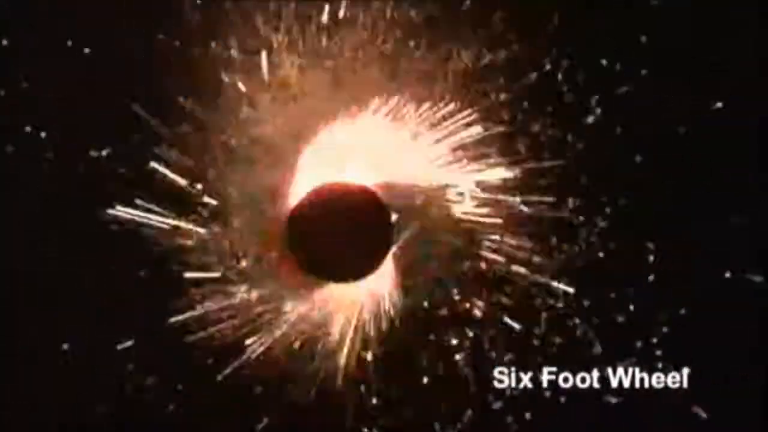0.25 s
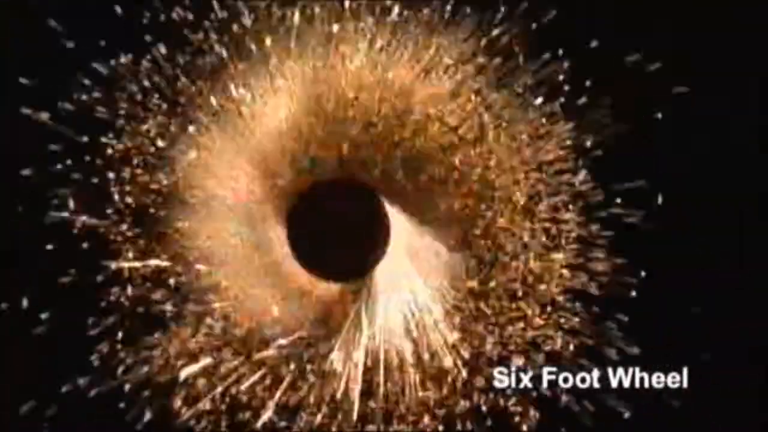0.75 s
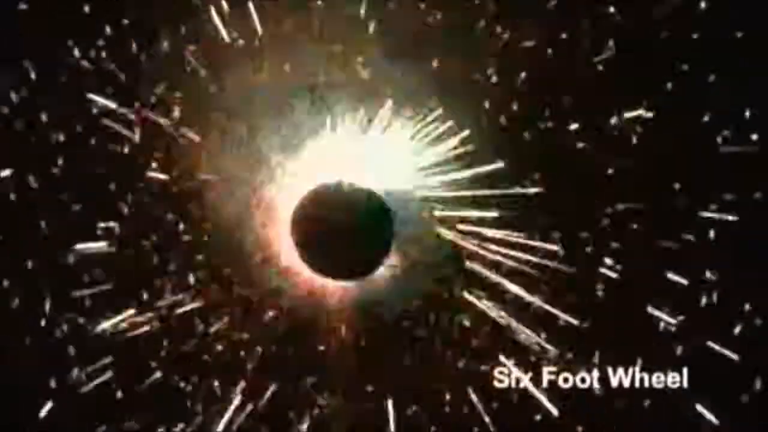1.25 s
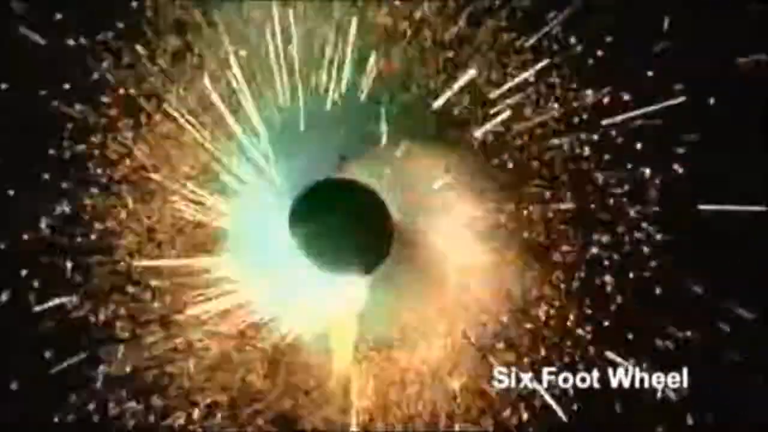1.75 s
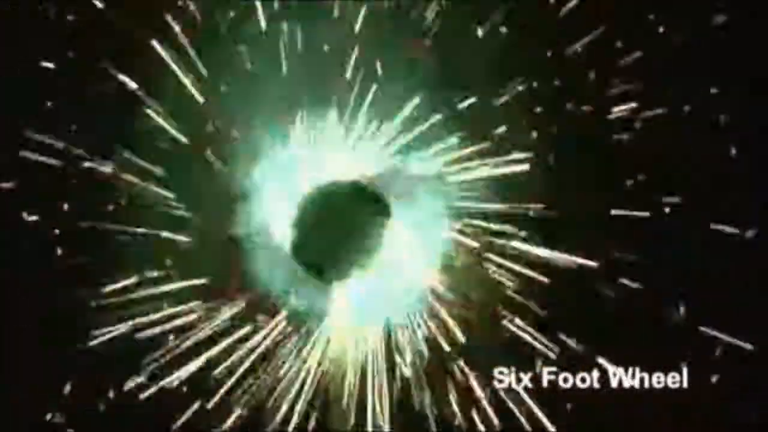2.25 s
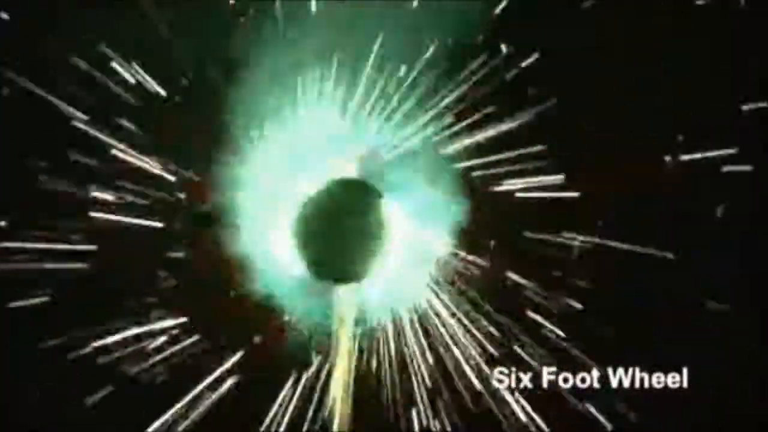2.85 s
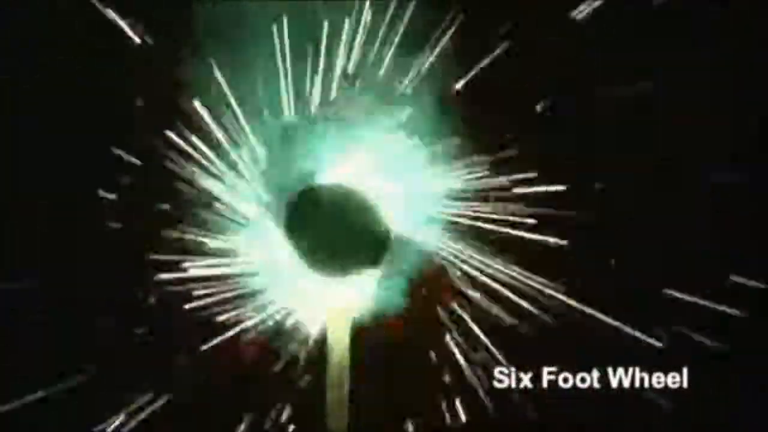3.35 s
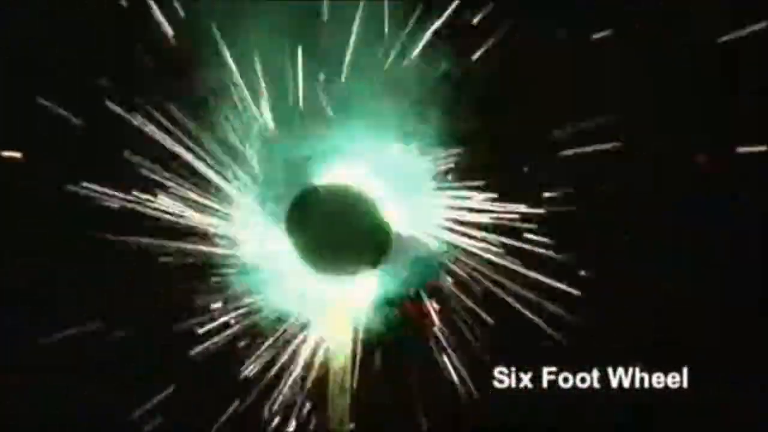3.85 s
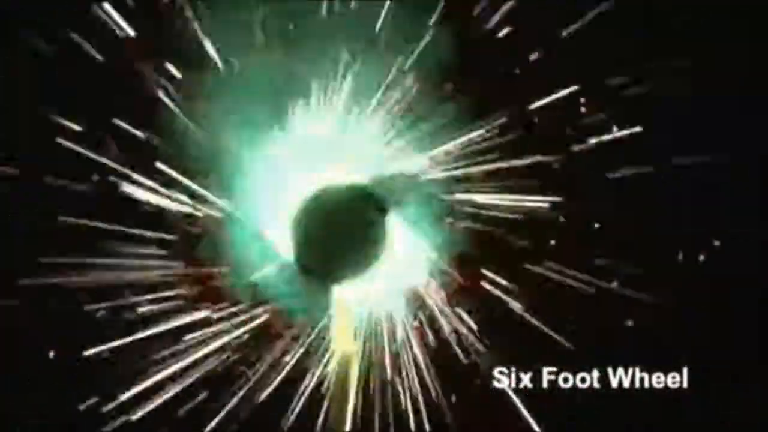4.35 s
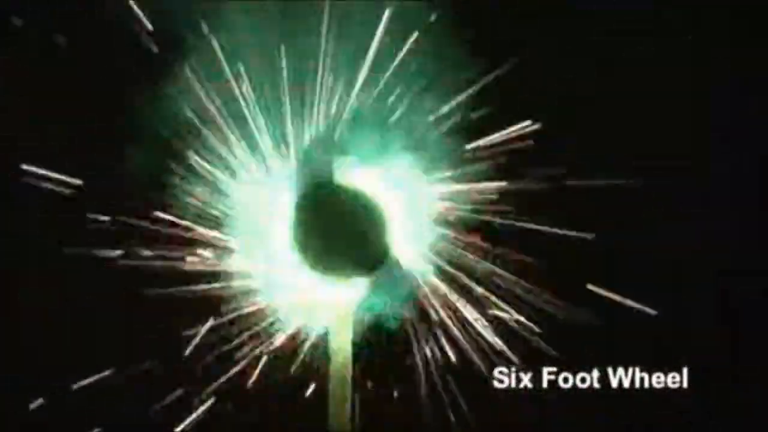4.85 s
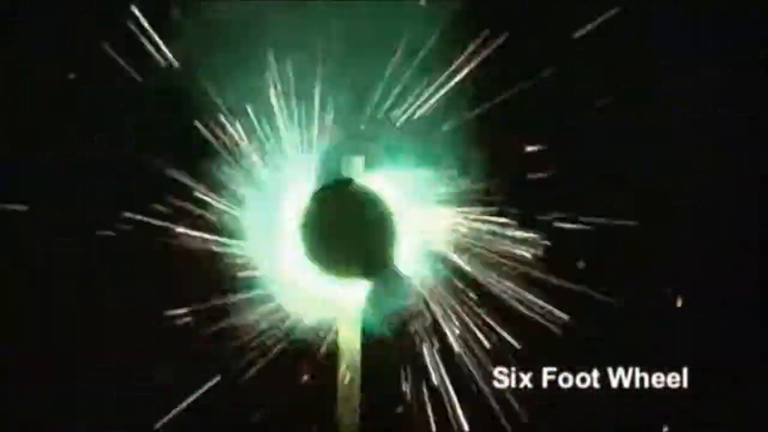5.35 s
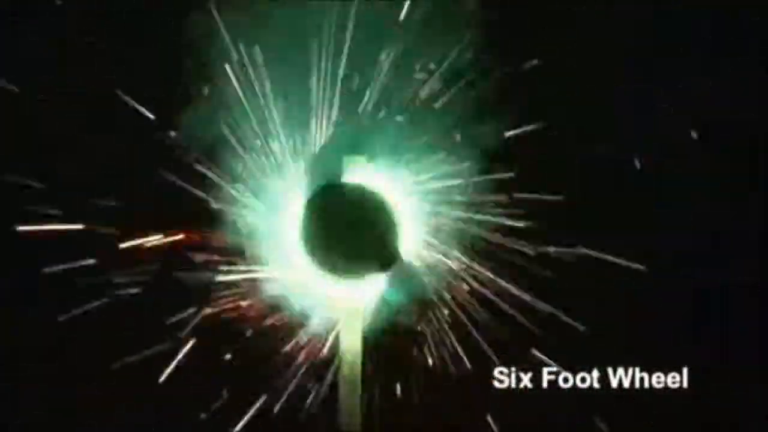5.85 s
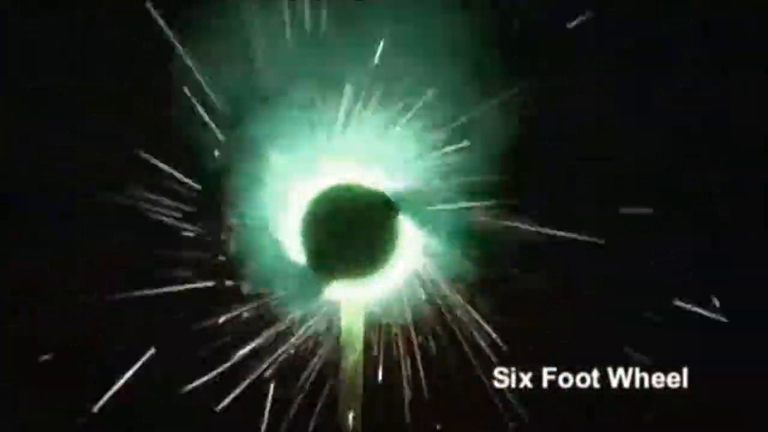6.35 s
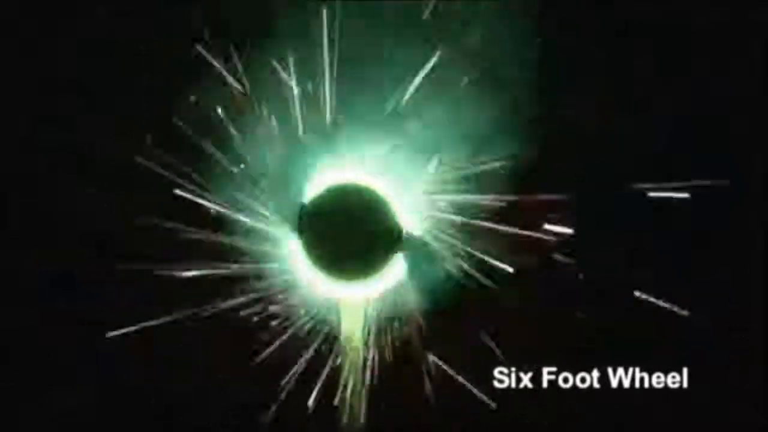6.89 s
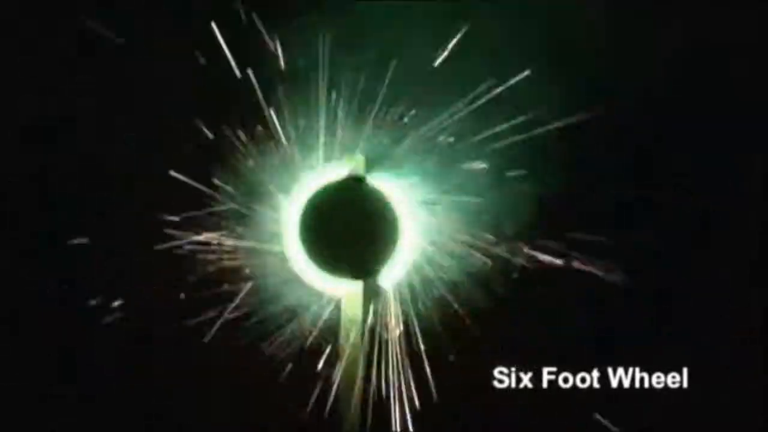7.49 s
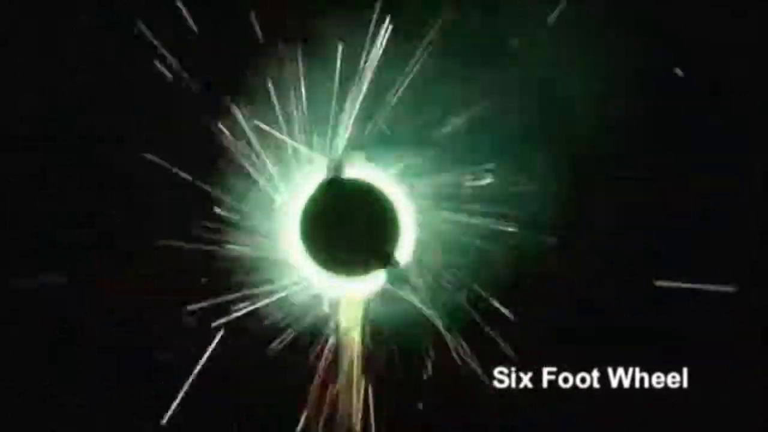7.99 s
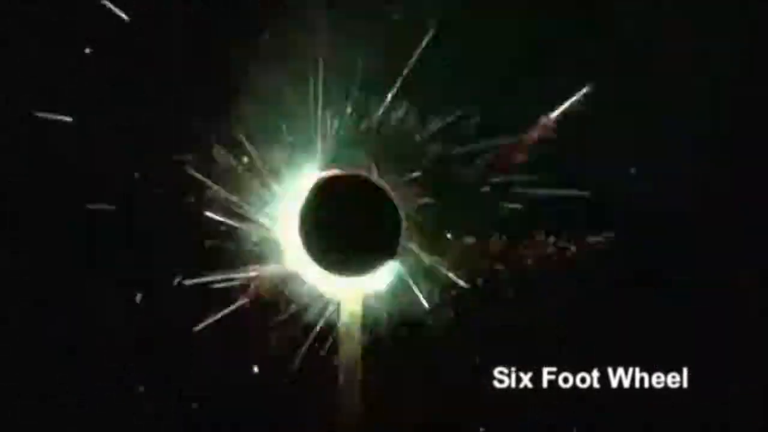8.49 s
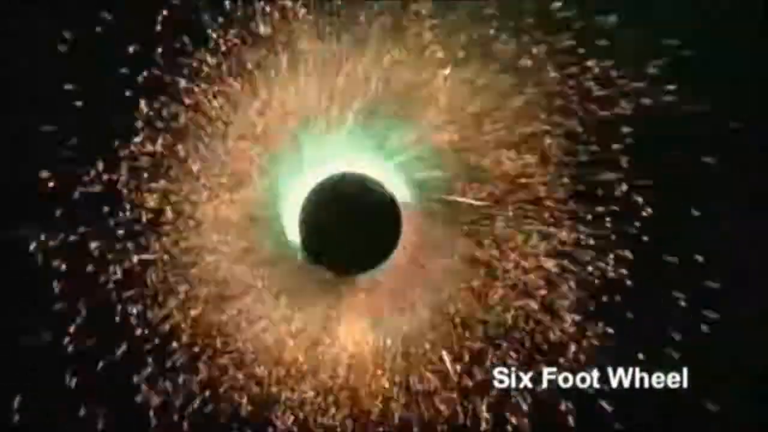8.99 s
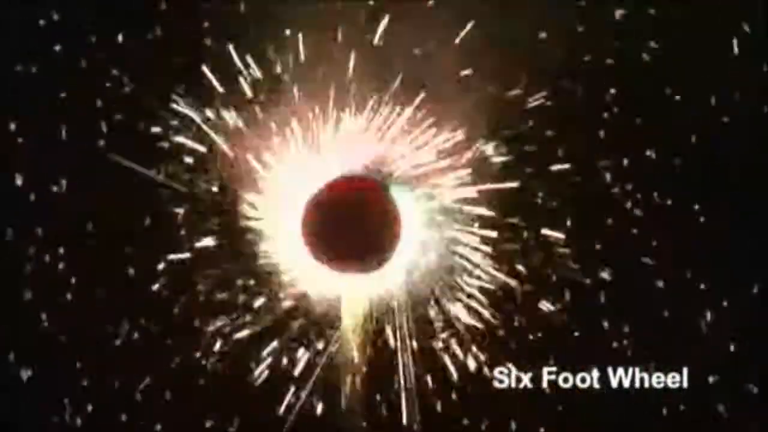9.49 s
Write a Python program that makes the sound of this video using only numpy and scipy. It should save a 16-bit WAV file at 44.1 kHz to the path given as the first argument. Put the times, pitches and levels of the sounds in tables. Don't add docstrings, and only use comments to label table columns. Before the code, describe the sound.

A spinning firework wheel hisses and roars with a fast fluttering whoosh, accelerating, with low wind thumps and sharp crackling pops near the end.

```python
import sys
import numpy as np
from scipy import signal
from scipy.fft import rfft, irfft, next_fast_len
from scipy.io import wavfile
from scipy.ndimage import uniform_filter1d, map_coordinates

SR = 44100
rng = np.random.default_rng(int(sys.argv[2]) if len(sys.argv) > 2 else 0)


def makeup_ratio(level_db):
    decades = np.asarray(level_db, float) / 20
    return 10 ** decades


def file_out(sig):
    cols = np.atleast_2d(sig).T
    lim = np.clip(cols, -1, 1)
    pcm = np.round(lim * 32767).astype(np.int16)
    wavfile.write(sys.argv[1], SR, pcm)


N = 429093
T = np.arange(N) / SR
PAD = next_fast_len(N)
HZ = np.fft.rfftfreq(PAD, 1 / SR)

# start_s, gas_power_db, jet_sharpness_db
BURN = [(0, -28.5, 2), (.32, -26.5, 0), (.56, -31.5, 1.5), (.99, -26.5, 0.09), (1.15, -29, -2),
        (1.3, -33.5, -1.5), (1.63, -24, -6.5), (2.0, -24, -5), (2.25, -26, -4.5), (2.75, -24.5, -5.5),
        (4.3, -23.5, -2.2), (6.2, -23.5, -0.9), (6.9, -25, 0.1), (7.6, -26, 6), (8.45, -26.5, 3.5),
        (8.68, -29.5, 2.5), (9.24, -26, 1), (9.58, -27.5, 4.5)]
ROAR_REF_DB = -27
GREEN_FROM_S, GREEN_TO_S, CHANGE_S, BURNOUT_S = 1.4, 8.52, 0.31, 0.099
GOLD_CATCHES_S = 8.33
GROUND_MS, SWING_MS = .937, .082
BUFFET_HZ = 75
FRAME, GRID = 1024, 752


def unit(x):
    return x / np.sqrt(np.mean(x ** 2))


def curves(table):
    s, *columns = np.transpose(table)
    return [np.interp(T, s, c) for c in columns]


def shape(x, gain):
    return irfft(rfft(x, PAD) * gain, PAD)[..., :N]


def colour(x, points):
    hz, db = np.transpose(points)
    return shape(x, makeup_ratio(np.interp(np.log(HZ + 1), np.log(hz), db)))


def below(x, hz):
    return shape(x, 1 / (1 + (HZ / hz) ** 8))


def peak(hz, width_hz):
    return 1 / (1 + (2 * (HZ - hz) / width_hz) ** 4)


def walk(rate_hz):
    hold = int(SR / rate_hz)
    steps = np.repeat(rng.standard_normal(N // hold + 1), hold)
    slewed = uniform_filter1d(uniform_filter1d(steps, hold), hold)
    return unit(slewed[:N])


def after(s, ramp_s):
    return np.clip((T - s) / ramp_s + .5, 0, 1)


def green(end_s=GREEN_TO_S):
    share = after(GREEN_FROM_S, CHANGE_S) - after(end_s, BURNOUT_S)
    return share, share * (T - GREEN_FROM_S)


def via_ground(x, lag_ms):
    # pitch_hz, level_db re direct
    ground = [(500, -9), (2200, -6), (3500, -4), (7000, -4.5), (10000, -9), (16000, -18)]
    echo = map_coordinates(colour(x, ground), [np.arange(N) - lag_ms * SR / 1000], order=3)
    return x + echo


def flame(alone):
    # pitch_hz, level_db per Hz
    jet_spectrum = [(210, -32), (350, -21.5), (662, -11), (925, -6.5), (1670, -3.5), (2090, -1), (2780, -3),
                    (3310, -1), (4410, -8.5), (5180, -7), (5610, -7.5), (7010, -7.5), (9490, -9.5),
                    (15100, -13), (15800, -41.5)]
    splits_hz = [1650, 4000, 7700]
    spit_db, flicker_db = 0.98, 0.52
    sparks_per_s, spark_spread_db, spark_db = 1500, 4, -12
    falter_db, falter_dull_db = -3, 0

    gas = rng.standard_normal(N) * makeup_ratio(spit_db * walk(120))
    bursts = (rng.random(N) < sparks_per_s / SR) * rng.standard_normal(N)
    bursts = bursts * makeup_ratio(spark_spread_db * rng.random(N))
    jet = colour(unit(gas) + makeup_ratio(spark_db) * unit(bursts), jet_spectrum[:-1])
    lows = [0] + [below(jet, hz) for hz in splits_hz] + [jet]
    low, roar, hiss, sizzle = (unit(b - a) * makeup_ratio(flicker_db * walk(22)) for a, b in zip(lows, lows[1:]))

    jet_db, sharp_db = curves(BURN)
    jet_db = jet_db + falter_db * alone
    sharp_db = sharp_db + falter_dull_db * alone
    extra_db = jet_db - ROAR_REF_DB
    share, age_s = green()

    low_db = -7 - 0.53 * extra_db - .5 * green(GOLD_CATCHES_S)[1]
    sizzle_db = -5.5 + 1.04 * sharp_db - 0.15 * extra_db + 0.4518 * age_s
    sizzle_db += -4.5 * (1 - after(GREEN_FROM_S, CHANGE_S))
    whistle = unit(shape(jet, peak(4090, 300)))
    whistle_db = -13 + 0.355 * sharp_db
    whistle_db += -41 * share * np.exp(-age_s / 0.5)
    whistle_db += 4.5 * after(GREEN_TO_S, BURNOUT_S)

    deep = below(roar, 2700)
    upper_db = -1.5 * share + .5 * age_s
    roar = deep + (roar - deep) * makeup_ratio(upper_db) + makeup_ratio(whistle_db) * whistle
    return makeup_ratio(jet_db) * (roar + makeup_ratio(low_db) * low + makeup_ratio(sharp_db) * hiss + makeup_ratio(sizzle_db) * sizzle)


def nozzle(turns, share):
    cusp_ms, wobble_ms = .012, .012
    beam_db, beam_turns, twice_db, twice_turns = .8, .0, .4, -.11
    angle = 2 * np.pi * turns
    sweep_db = beam_db * np.cos(angle - 2 * np.pi * beam_turns)
    sweep_db += twice_db * np.cos(2 * angle - 4 * np.pi * twice_turns)
    alone = abs(2 * share - 1)
    jet = flame(alone) * np.sqrt(share) * makeup_ratio(sweep_db - 0.83)
    lag_ms = GROUND_MS + SWING_MS * np.cos(angle) - cusp_ms * np.cos(2 * angle) + wobble_ms * walk(40)
    return via_ground(jet, lag_ms)


def wheel():
    # start_s, turns_per_s
    spin = [
        (0, 9.8),
        (1.2, 12.14),
        (1.6, 12.22),
        (2.4, 13.19),
        (4.3, 15.0),
        (6, 17.87),
        (8.4, 21.12),
        (9.73, 19.62),
    ]
    # start_s, end_s, first_nozzle_share (0-1)
    solos = [
        (.35, .87, .97),
        (1.175, 1.86, .05),
        (2.13, 2.4, .25),
        (7.05, 8.45, .68),
        (8.53, 9.05, .95),
        (9.33, 9.78, .9),
    ]
    start_turns, falter_s, relight_s = .32, .05, .2
    turns = start_turns + np.cumsum(curves(spin)[0]) / SR
    share = .5 + sum((part - .5) * (after(a, falter_s) - after(b, relight_s)) for a, b, part in solos)
    return nozzle(turns, share) + nozzle(turns + .5, 1 - share)


def night():
    # pitch_hz, level_db per Hz
    murmur = [(53, -44), (90, -21), (118, -1.5), (241, 4.5), (430, -2), (600, -2.5), (780, -20),
              (1320, -120)]
    # start_s, level_db
    breeze = [(0, -67), (1.5, -64), (1.85, -58), (2.2, -65), (3.8, -58.5), (4.4, -53), (5.5, -58),
              (6.3, -73.5), (6.8, -62), (8.4, -66.5), (9.3, -65), (9.4, -57), (9.73, -58)]
    broken_db, murmur_flicker_db = 2.0, 0.5
    rumble_width_hz, sub_db = 46, -2.5

    share, age_s = green(GOLD_CATCHES_S)
    air_db = -48 - 3 * share - 0.53 * age_s + 0.284 * (curves(BURN)[0] - ROAR_REF_DB)
    resonance = 1 / (1 + 1j * (HZ ** 2 - BUFFET_HZ ** 2) / (HZ + 1) / rumble_width_hz)
    wind_gain = resonance ** 2 + makeup_ratio(sub_db) * peak(45, 21.4)
    rumble = unit(shape(rng.standard_normal(N), wind_gain))
    air = unit(colour(rng.standard_normal(N), murmur))
    rumble = rumble * makeup_ratio(curves(breeze)[0] + broken_db * walk(17))
    return rumble + air * makeup_ratio(air_db + murmur_flicker_db * walk(14))


def thumps():
    # middle_s, length_s, peak_db
    gusts = [(1.13, 0.096, -63), (1.87, .08, -54), (3.53, .05, -56), (5.6, .08, -57.5), (6.5, .08, -57),
             (6.73, .1, -68), (7.896, .08, -60), (4.004, .06, -36), (4.054, 0.094, -24), (4.11, .07, -44),
             (4.19, .07, -43), (4.312, 0.042, -48), (4.347, .03, -52), (4.75, .06, -50),
             (4.874, 0.063, -51), (7.022, 0.085, -50), (7.34, 0.038, -46.5), (7.372, .03, -49),
             (7.4, .04, -48), (9.385, .05, -51), (9.448, .03, -46), (9.502, 0.077, -32.5),
             (9.544, .05, -43), (9.6, .1, -50)]
    second_db, third_db, rattle_db, roundness = -22, -24, -17, 1.3
    phase = 2 * np.pi * np.cumsum(BUFFET_HZ + 1.5 * walk(18)) / SR
    tone = np.sin(phase) + makeup_ratio(second_db) * np.sin(2 * phase) + makeup_ratio(third_db) * np.sin(3 * phase)
    rattle = unit(below(rng.standard_normal(N), 355))
    swell = np.zeros(N)
    for s, length_s, db in gusts:
        span = slice(int((s - length_s / 2) * SR), int((s + length_s / 2) * SR))
        arch = np.clip(1 - (2 * (T[span] - s) / length_s) ** 2, 0, 1)
        swell[span] += makeup_ratio(db) * arch ** roundness
    return (np.sqrt(2) * tone + makeup_ratio(rattle_db) * rattle) * swell


def dull(x):
    return signal.sosfilt(signal.butter(2, (500, 6500), "band", fs=SR, output="sos"), x)


def pops():
    # start_s, peak_db, pitch_hz, t60_s, crack_db re peak
    bangs = [(1.677, -35, 165, .04, -14), (1.89, -39, 200, .1, -30), (3.98, -31.5, 190, 0.06, -20),
             (5.146, -30, 220, 0.021, -5), (5.02, -27.5, 400, .015, -8), (5.148, -17, 890, 0.014, -8),
             (5.157, -30, 120, 0.026, -10), (7.519, -10.5, 1120, 0.0109, -18),
             (8.546, -31, 260, 0.039, -12), (8.738, -17, 2210, .015, -7),
             (8.81, -16.5, 3150, 0.0127, -14.5), (8.831, -10.5, 3570, 0.022, -15.5),
             (8.8465, -9, 4100, 0.0193, -18), (8.85, -16, 950, 0.012, -6), (9.166, -15.5, 1310, 0.017, -14),
             (9.474, -31, 200, 0.091, -22), (9.305, -23.5, 233, 0.026, 0), (9.307, -17, 962, 0.0144, -5)]
    rise_s, crack_s = 0.00066, 0.0015
    out, t = np.zeros(N), T[:4000]
    for s, peak_db, hz, t60_s, crack_db in bangs:
        ring = np.sin(2 * np.pi * hz * t) * makeup_ratio(-60 * t / t60_s) * (1 - np.exp(-t / rise_s))
        crack = makeup_ratio(crack_db) * (rng.standard_normal(len(t)) - 1) * np.exp(-t / crack_s)
        out[int(s * SR):][:len(t)] += makeup_ratio(peak_db) * (ring + dull(crack))
    return via_ground(out, GROUND_MS + SWING_MS)


def scene():
    mono = wheel() + night() + thumps() + pops()
    return np.array([mono, mono])


def frame_at(s):
    return GRID + FRAME * (round((s * SR - GRID) / FRAME) - 1)


def noise_frame(lo_hz, hi_hz, side_db):
    lines = np.arange(round(lo_hz * 2 * FRAME / SR), round(hi_hz * 2 * FRAME / SR)) + .5
    waves = np.cos(np.pi / FRAME * np.outer(np.arange(2 * FRAME) + (FRAME + 1) / 2, lines))
    window = signal.windows.kaiser_bessel_derived(2 * FRAME, 4 * np.pi)
    return window * (waves @ unit(rng.standard_normal(len(lines)))) * makeup_ratio(side_db) * np.sqrt(2 / FRAME)


def roll_off(x):
    return signal.sosfilt(signal.butter(12, 16010, fs=SR, output="sos"), x)


def record(dry):
    # pitch_hz, width_hz, level_db
    housing = [(849.3, 325, 5), (1461, 146, 3.5), (2620, 211, 2), (3110, 670, -2), (4100, 150, -4.5),
               (5594, 520, -3), (6990, 390, -1.5), (8170, 340, -1.5), (8504, 500, 2), (9704, 980, -2.5),
               (10374, 500, 3), (11660, 470, 2.5), (12900, 420, 3), (13300, 300, -2)]
    wide_s = [.551, 1.178, 1.851, 1.875, 2.873, 3.152, 3.43, 4.522, 4.545, 5.334, 5.497, 5.752, 6.031,
              6.286, 6.519, 6.867, 6.983, 7.424, 7.494, 7.796, 8.283, 9.096, 9.421]
    top_hz, stray_share, stray_db = 15740, .35, -45
    wide_low_hz, wide_high_hz, wide_width_hz, wide_db = (4200, 7000), (7600, 13600), 1400, -3

    housing_db = sum(db / (1 + (2 * (HZ - hz) / width) ** 2) for hz, width, db in housing)
    wet = shape(dry[0], makeup_ratio(housing_db) * (HZ < top_hz))
    side = np.zeros(N)
    for s, (low, high) in zip(wide_s, rng.random((len(wide_s), 2))):
        start = frame_at(s)
        power = abs(rfft(wet[start:start + 2 * FRAME])) ** 2 / (2 * FRAME)
        for hz in np.interp(low, (0, 1), wide_low_hz), np.interp(high, (0, 1), wide_high_hz):
            band = power[int(hz * 2 * FRAME / SR):int((hz + wide_width_hz) * 2 * FRAME / SR)]
            noise = noise_frame(hz, hz + wide_width_hz, wide_db)
            side[start:start + 2 * FRAME] += noise * np.sqrt(band.mean())
    for k in range(2, N // FRAME - 2):
        if rng.random() < stray_share:
            start = frame_at(k * FRAME / SR)
            side[start:start + 2 * FRAME] += noise_frame(130, 172, stray_db)
    return roll_off(wet + side * np.array([[1], [-1]]))


dry = scene()
out = record(dry)
file_out(out)
```